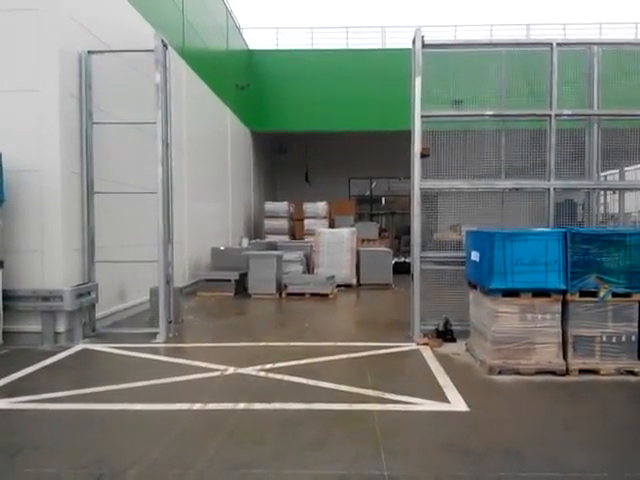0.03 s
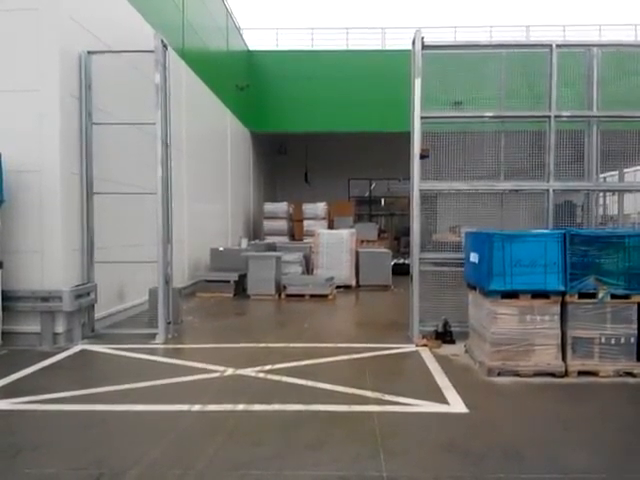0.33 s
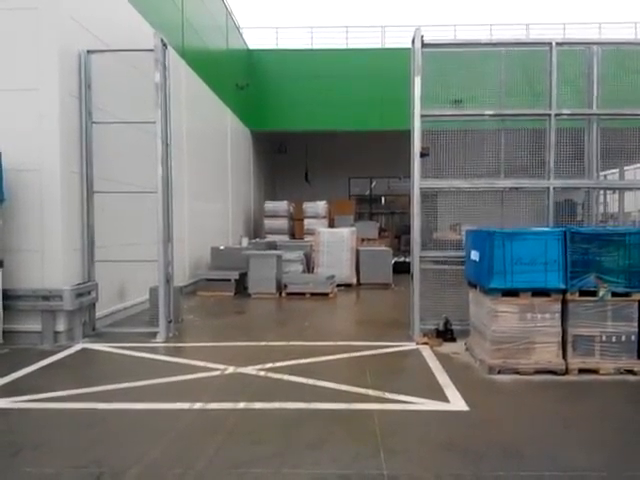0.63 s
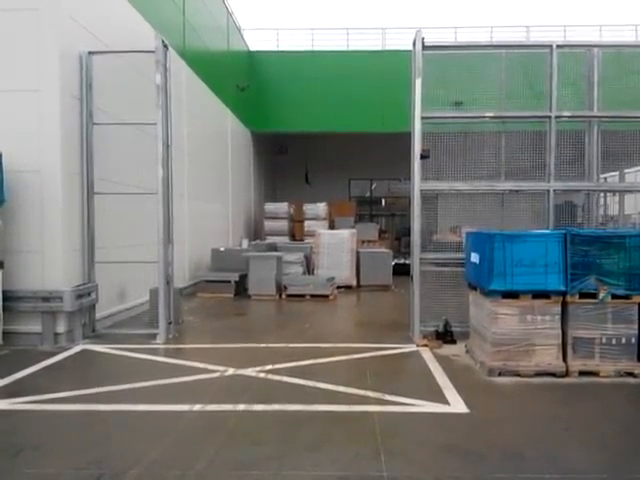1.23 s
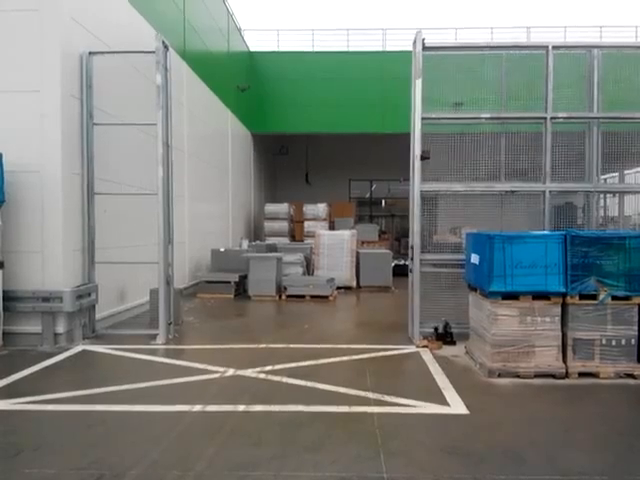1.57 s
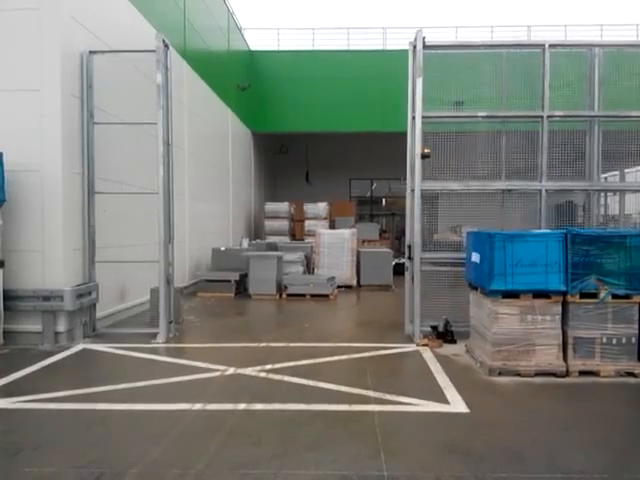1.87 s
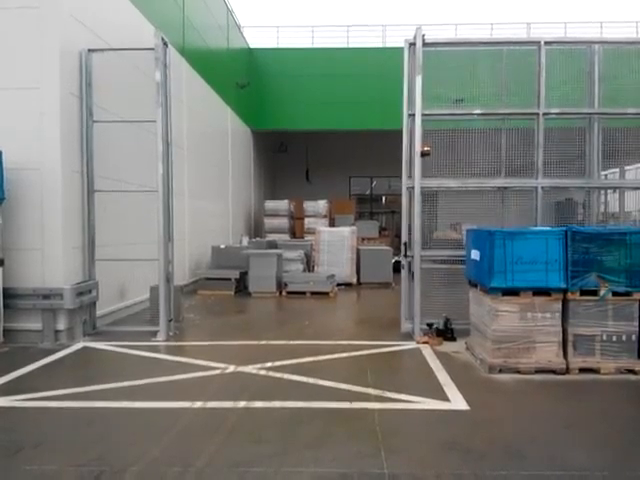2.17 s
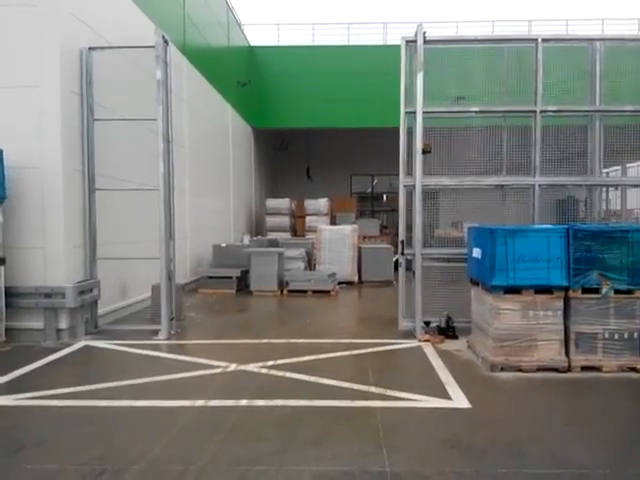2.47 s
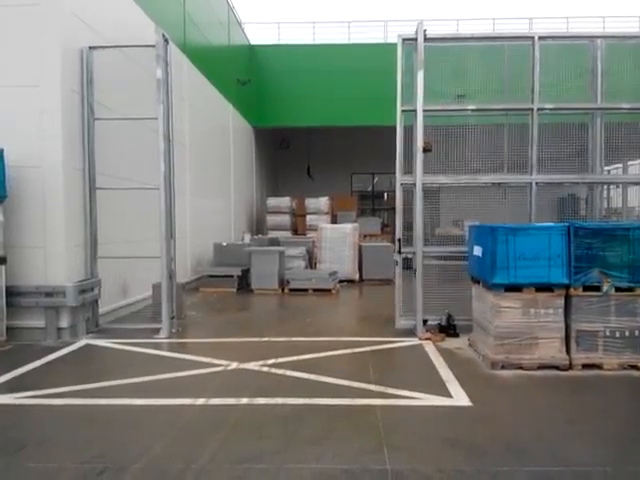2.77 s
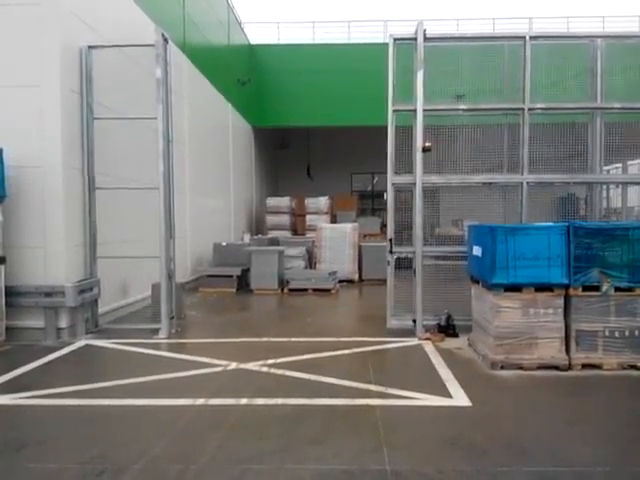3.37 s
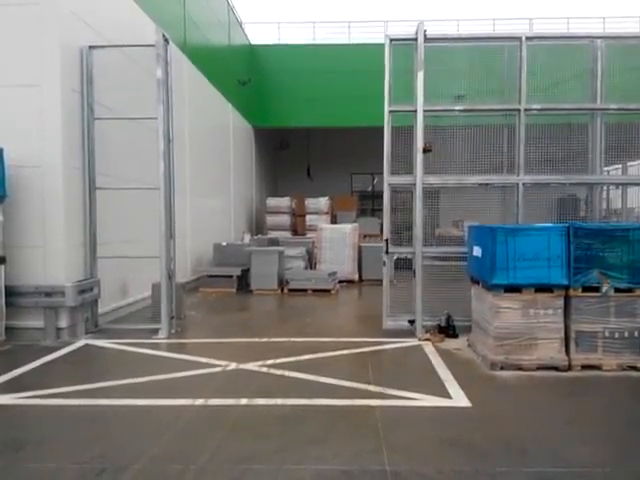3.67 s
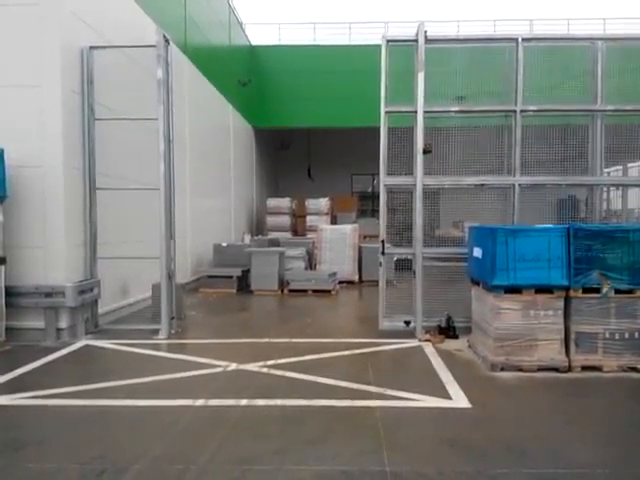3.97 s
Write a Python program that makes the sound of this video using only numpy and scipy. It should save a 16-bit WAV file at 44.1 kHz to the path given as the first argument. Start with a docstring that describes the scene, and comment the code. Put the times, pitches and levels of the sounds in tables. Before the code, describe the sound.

A heavy steel sliding gate knocks twice, gives one bright, booming clank, then rolls with growling wheels and rattling bars. It is heard from some metres away in an echoing walled yard, over low machinery rumble and hum.

```python
"""A heavy steel sliding gate, some metres away in a walled industrial yard.
It knocks twice, its drive takes up the slack with one bright clank that sets the frame booming,
and it rolls off, wheels growling and loose bars rattling. Each blow is a noise burst plus ringing
steel modes, and the walls answer with a diffuse tail. Underneath sit a low, wavering drone
and a bed of machinery rumble, hum and yard air."""
import sys
import numpy as np
from scipy import signal
from scipy.fft import rfft, irfft, next_fast_len
from scipy.io import wavfile
from scipy.ndimage import map_coordinates

SR = 44100
rng = np.random.default_rng(int(sys.argv[2]) if len(sys.argv) > 2 else 0)


def bounce(signal):
    """Save signal as a 16-bit WAV file at the path given by the first command-line argument."""
    frames = np.transpose(np.atleast_2d(signal))
    limited = np.clip(frames, -1, 1)
    pcm = np.round(limited * 32767).astype(np.int16)
    wavfile.write(sys.argv[1], SR, pcm)


N = 176400


def amp(db):
    """Decibels to gain."""
    return 10 ** (np.asarray(db) / 20)


def unit(x):
    """Scale to rms 1."""
    return x / np.sqrt(np.mean(x ** 2) + 1e-20)


def along(points, hz):
    """Read a (frequency, value) curve on a log frequency axis."""
    freqs, values = np.transpose(points)
    return np.interp(np.log(hz + 1), np.log(freqs + 1), values)


def wobble(rate):
    """Smooth random modulation, rate knots a second."""
    return map_coordinates(rng.standard_normal(1024), [np.arange(N) * rate / SR + 2], mode="mirror")


def attack(t, rise_s):
    """Onset envelope with time constant rise_s."""
    return 1 - np.exp(-t / rise_s)


def fade(t, t60):
    """Exponential decay, 60 dB down after t60 seconds."""
    return np.exp(-np.log(1000) * t / t60)


def add(out, s, sound):
    """Mix a sound in at time s."""
    part = out[:, max(round(s * SR), 0):]
    part[:, :sound.shape[1]] += sound[:, :part.shape[1]]


def filtered(x, response):
    """EQ x with a gain that is a function of frequency."""
    n = x.shape[-1]
    padded = next_fast_len(n + 8192)
    return irfft(rfft(x, padded) * response(np.fft.rfftfreq(padded, 1 / SR)), padded)[..., :n]


def panned(x, pan):
    """Lean a sound to the left, by a different amount at each frequency."""
    return filtered(x, lambda hz: amp(along(pan, hz) * np.array([[.5], [-.5]])))


# Stereo image of the noise (frequency [Hz], left-right correlation [-1..1])
CORRELATION = [(130, 0.99), (350, 0.96), (700, 0.88), (1400, 0.74), (2800, 0.67), (3800, 0.3),
               (4800, 0.049), (6000, -0.34), (7500, -0.46)]
def noise(colour_db, size):
    """Stereo noise of rms 1, centred in the bass and wide in the treble."""
    def mid_side_gains(hz):
        angle = np.arccos(np.clip(along(CORRELATION, hz), -1, 1)) / 2
        return amp(colour_db(hz)) * [np.cos(angle), np.sin(angle)]
    mid, side = filtered(rng.standard_normal((2, size)), mid_side_gains)
    return unit(np.array([mid + side, mid - side]))


def rush(colour, size):
    """Noise shaped by an EQ curve."""
    return noise(lambda hz: along(colour, hz), size)


def band(centre_hz, octaves, size):
    """Noise in one resonance."""
    return noise(lambda hz: -20 * np.log10(1 + (np.log2((hz + 1) / centre_hz) / octaves) ** 2 / 2), size)


# Machinery hum lines (frequency [Hz], level [dB], phase wander [rad])
HUM_LINES = [(50.3, -45, 0.15), (100.37, -45, 0.071), (149.4, -52.5, 0.05), (207, -52.5, 2.7),
             (255, -58.5, 0.58), (300.1, -58.5, 0.1)]
# EQ of the machinery rumble and of the yard air (frequency [Hz], gain [dB])
RUMBLE_EQ = [(20, -31.5), (31, -13.5), (43, -15.5), (49, -0.5), (60, 4.5), (88, 0.5), (112, -2.5), (140, 0),
             (175, -4.5), (215, 1.5), (255, -6.5), (265, -16), (295, -15.5), (320, -24), (400, -42),
             (600, -68.5)]
AIR_EQ = [(190, -42), (330, -4.5), (400, -4.5), (460, -2.5), (580, -4.5), (640, -6.5), (800, -13.5),
          (1150, -16), (1700, -18.5), (3600, -17), (5300, -17.5), (5900, -20.5), (7400, -24), (8200, -41),
          (10000, -80.5)]
def machinery(rumble_db=-41.5, air_db=-57, waver_db=0.5):
    """The bed: steady rumble, wavering hum lines and the air of the yard."""
    t = np.arange(N) / SR
    hum = np.zeros(N)
    for hz, db, wander in HUM_LINES:
        peak = np.sqrt(2) * amp(db + waver_db * wobble(7.2))
        hum += peak * np.sin(2 * np.pi * hz * t + wander * wobble(6))
    air = amp(air_db + 0.83 * wobble(8)) * rush(AIR_EQ, N)
    return hum + amp(rumble_db) * rush(RUMBLE_EQ, N) + air


# Pitch and level automation of the drone (time [s], pitch [Hz], level [dB])
DRONE_PATH = [(0, 208.8, -53), (.2, 204, -43), (0.701, 207, -43), (1.053, 215.4, -46), (1.5, 214.4, -47.5),
              (1.852, 223.1, -45.5), (2.397, 221.9, -56.5), (2.717, 238, -43), (3.051, 238.2, -47.5),
              (3.298, 211.6, -46.5), (4, 215.5, -46.5)]
def drone(wander_rad=0.85, waver_db=2.0):
    """A low, wavering tone that rises a little while the gate travels, then sinks back."""
    t = np.arange(N) / SR
    s, hz, db = np.transpose(DRONE_PATH)
    phase = 2 * np.pi * np.cumsum(np.interp(t, s, hz)) / SR + wander_rad * wobble(12)
    return np.sqrt(2) * amp(np.interp(t, s, db) - waver_db * wobble(5.4)) * np.sin(phase)


# Fader ride of the wheel growl (time [s], level [dB])
GROWL_RIDE = [(0, -69), (.8, -48), (1.5, -43.5), (2.2, -43.5), (2.8, -47.5), (3.3, -45), (4, -55.5)]
# EQ of the growl (frequency [Hz], gain [dB])
GROWL_EQ = [(60, -32.5), (130, -2), (200, -2), (245, 0.5), (275, -7), (330, -17.5), (420, -34),
            (600, -25.5), (900, -61.5)]
def wheel_growl():
    """The low growl of the wheels swells and eases off."""
    t = np.arange(N) / SR
    return amp(np.interp(t, *np.transpose(GROWL_RIDE))) * rush(GROWL_EQ, N)


# Fader ride of the rolling on the track (time [s], level [dB])
ROLL_RIDE = [(0, -62.5), (1.5, -68), (1.9, -62.5), (2.4, -62.5), (3.0, -60), (3.4, -62.5), (4, -63.5)]
# EQ of steel contact noise, for rolling and knocks (frequency [Hz], gain [dB])
CONTACT_EQ = [(400, -14.5), (850, -13), (1200, -0.5), (1450, -4.5), (1750, -1.5), (2050, -2.5), (2350, -3),
              (2750, -3.5), (3550, -8), (3850, -11), (5300, -15.5), (5900, -33), (7800, -45),
              (10000, -71.5)]
def rolling(jitter_db=2, hiss_db=-68.5, hiss_start_s=3.308, hiss_rise_s=0.25):
    """The wheels keep the steel trembling; a thin hiss joins late."""
    t = np.arange(N) / SR
    level_db = np.interp(t, *np.transpose(ROLL_RIDE)) + jitter_db * wobble(40)
    tremble = amp(level_db) * rush(CONTACT_EQ, N)
    hiss = amp(hiss_db) * band(centre_hz=5170, octaves=0.099, size=N)
    return tremble + hiss * np.clip((t - hiss_start_s) / hiss_rise_s, 0, 1)


# Ticks and scuffs (time [s], level [dB], centre [Hz], width [octaves], t60 [s])
TICK_CUES = [(.012, -53.5, 4400, 0.075, 0.059), (0.055, -49.5, 4700, 0.096, 0.055),
             (.056, -56, 2070, 0.13, 0.071), (.076, -51, 3010, 0.012, 0.18),
             (0.118, -48, 1800, 0.23, 0.037), (.491, -51.5, 4830, 0.17, 0.041),
             (0.518, -64, 4900, 0.29, 0.57), (0.594, -59.5, 4400, 0.12, 0.22),
             (0.988, -50.5, 1920, 0.32, 0.033), (1.035, -54.5, 5070, 0.26, 0.036),
             (1.25, -46.5, 2300, 0.45, 0.015), (1.291, -51, 3400, 0.16, 0.05),
             (1.299, -48.5, 3140, 0.38, 0.03), (1.4433, -41.5, 4750, 0.092, 0.063),
             (1.443, -47, 2130, 0.38, 0.099), (2.23, -56.5, 4640, 0.29, 0.41),
             (2.265, -57, 4000, 0.13, 0.33), (2.293, -49, 3220, 0.16, 0.061),
             (2.581, -57.5, 4250, 0.2, .15)]
def ticks(attack_s=0.0013):
    """Light contacts, each in one short resonance, the loudest just before the clank."""
    out, t = np.zeros((2, N)), np.arange(SR // 2) / SR
    for s, db, hz, octaves, t60 in TICK_CUES:
        add(out, s, amp(db) * band(hz, octaves, len(t)) * fade(t, t60) * attack(t, attack_s))
    return out


# Reverb time of the walled yard (frequency [Hz], t60 [s])
YARD_DECAY = [(300, 1.5), (1200, 2.9), (2500, 2.7), (4000, 1.7), (7000, .65)]
def yard_tail(colour, size):
    """The walls answer with a diffuse tail whose treble dies first."""
    hz, t, spectrum = signal.stft(rush(colour, size), SR, nperseg=256)
    decay = fade(t, along(YARD_DECAY, hz)[:, None])
    return signal.istft(spectrum * decay, SR, nperseg=256)[1][:, :size]


def steel(modes, t, detune_hz, neighbour_db, wide_hz=4760):
    """Ringing steel: each mode beats against two weaker neighbours, differently on every strike."""
    ring = np.zeros((2, len(t)))
    for hz, db, t60 in modes:
        envelope = amp(db) * fade(t, t60)
        for k, (start, detune, spread) in enumerate(rng.standard_normal((3, 3))):
            gain, pitch = (amp(neighbour_db), hz + detune_hz * detune) if k else (1, hz)
            # Modes near wide_hz reach the two ears about a radian apart.
            phase = np.pi * start + np.array([[spread], [-spread]]) * (hz / wide_hz) ** 2 / 2
            ring += gain * envelope * np.sin((2 * np.pi * pitch * t + phase).astype(np.float32))
    return ring


# Lurches of the gate (time [s], level [dB])
THUD_CUES = [(0.1712, -37.5), (0.288, -45), (1.727, -36.5)]
# EQ of a thud (frequency [Hz], gain [dB])
THUD_EQ = [(60, -29.5), (85, -10), (102, 7.5), (125, -3.5), (150, -5.5), (200, -10), (280, -55)]
def thuds(attack_s=0.0018, t60=1):
    """The whole gate lurches under its first three knocks, adding dull low-end weight."""
    out, t = np.zeros((2, N)), np.arange(SR) / SR
    for s, db in THUD_CUES:
        add(out, s, amp(db) * rush(THUD_EQ, len(t)) * fade(t, t60) * attack(t, attack_s))
    return out


# Loose knocks (time [s], level [dB], tail send [dB], tilt [dB/octave], ring focus [Hz])
KNOCK_CUES = [(0.1718, -46, -7, 3.5, 2950), (.287, -47.5, -3.5, 6, 3600), (1.727, -45, -7.5, 5.5, 3030),
              (1.892, -48.5, -18.5, 4.5, 2700), (1.986, -49.5, -9, 2, 2700), (2.099, -52, -21, 1, 2700),
              (2.381, -52.5, -4.5, -9, 1200), (2.501, -50, -20, 2.5, 1700), (2.52, -51, -16, 7, 3300),
              (2.678, -46.5, -11.5, 1, 2500), (2.684, -49.5, -8, -3.5, 1200), (2.759, -48, -13, -3.5, 1600),
              (2.811, -48.5, -16, -3, 2350), (2.939, -49, -6.5, 0, 1850), (3.019, -48, -3.5, 2.5, 3200),
              (3.06, -49.5, -5.5, -0.5, 1780), (3.149, -52, -12, -1, 2000), (3.191, -52.5, -14, -3, 2000),
              (3.54, -56, -6.5, -2.5, 2450), (3.686, -53.5, -16, -6, 1200), (3.796, -52.5, -8, -8.5, 1200),
              (3.955, -53, -8, -2, 1700)]
# Modes of the loose bars (frequency [Hz], level [dB], t60 [s])
BAR_MODES = [(1160, -6, 0.38), (1340, -8, 0.25), (1695, -1.5, 0.51), (1975, -1, 0.47), (2078, -4, 0.68),
             (2300, -12, 0.4), (2640, -5, 0.3), (2680, -2.5, 0.34), (3190, -4.5, 0.27), (3400, -7, 0.41),
             (3510, -6.5, 0.42)]
def knocks(contact_t60=0.075, attack_s=0.00033, ring_db=-6.5, yard_db=-7, focus_db=4.5, focus_oct=0.39):
    """The gate rattles; where each knock lands decides which of the loose bars ring most."""
    out, t = np.zeros((2, N)), np.arange(3 * SR // 4) / SR
    for s, db, tail_db, tilt_db, focus_hz in KNOCK_CUES:
        colour = [(hz, level + tilt_db * np.log2(min(hz, 3500) / 2000)) for hz, level in CONTACT_EQ]
        bars = [(hz, level + focus_db * np.exp(-(np.log2(hz / focus_hz) / focus_oct) ** 2), t60)
                for hz, level, t60 in BAR_MODES]
        ring = amp(ring_db) * steel(bars, t, detune_hz=27.3, neighbour_db=-5)
        reverb = amp(yard_db) * yard_tail(colour, len(t)) * fade(t, t60=1.6)
        contact = rush(colour, len(t)) * fade(t, contact_t60)
        add(out, s, amp(db) * (contact + amp(tail_db) * (ring + reverb)) * attack(t, attack_s))
    return out


# Jolts of the frame: the clank and its rebound (time [s], level [dB])
JOLT_CUES = [(1.4582, -59), (1.509, -50.5)]
# EQ of the frame's boom (frequency [Hz], gain [dB])
FRAME_EQ = [(250, -21), (370, -11), (450, 6.5), (560, -0.5), (680, -15), (900, -6.5), (1500, -54.5)]
def frame_boom(attack_s=0.0018, thump_db=9.5, thump_t60=0.036, boom_t60=3.3):
    """The heavy frame is jolted by the clank and rebounds harder: a short thump, then a long boom."""
    out, t = np.zeros((2, N)), np.arange(2 * SR) / SR
    envelope = (fade(t, boom_t60) + amp(thump_db) * fade(t, thump_t60)) * attack(t, attack_s)
    for s, db in JOLT_CUES:
        add(out, s, amp(db) * rush(FRAME_EQ, len(t)) * envelope)
    return out


# Blows within the clank (time [s], level [dB], ring send [dB])
CLANK_CUES = [(1.4583, -28.5, -12), (1.4645, -39.5, -15.5), (1.503, -42.5, -10), (1.514, -40, -14)]
# EQ of the crash (frequency [Hz], gain [dB])
CLANK_EQ = [(400, -37), (700, -21), (850, -9), (1020, -19), (1250, -10.5), (1520, -10), (2000, -6.5),
            (2660, -4.5), (2860, -6.5), (3300, -5.5), (4000, -5.5), (4900, -7), (5400, -12), (5800, -20.5),
            (8000, -38)]
# Modes of the drive and frame (frequency [Hz], level [dB], t60 [s])
DRIVE_MODES = [(840, -16, 0.14), (1188, -16.5, 0.62), (1412, -24, 0.47), (1780, -13, .45), (1948, -6, 0.59),
               (2400, -11.5, 1.2), (2404, -5, 0.35), (2630, -4.5, 0.76), (2706, 5, 0.22), (3260, 3, 0.15),
               (3590, -14, 0.8), (3740, 3, 0.12), (3920, -2, 0.096), (4300, -6, 0.18), (4870, -5, 0.33)]
def clank(attack_s=0.00088, crash_t60=0.049, mesh_db=-11, mesh_t60=0.59, yard_db=-18):
    """The main hit: the drive takes up its slack; quick blows crash, shake the mesh and ring the steel."""
    out, t = np.zeros((2, N)), np.arange(2 * SR) / SR
    envelope = fade(t, crash_t60) + amp(mesh_db) * fade(t, mesh_t60)
    for s, db, ring_db in CLANK_CUES:
        crash = envelope * rush(CLANK_EQ, len(t))
        ring = amp(ring_db) * steel(DRIVE_MODES, t, detune_hz=26.4, neighbour_db=-9)
        reverb = amp(yard_db) * yard_tail(CLANK_EQ, len(t)) * attack(t, rise_s=0.014)
        add(out, s, amp(db) * (crash + ring + reverb) * attack(t, attack_s))
    return out


# Pan of the gate and bed buses (frequency [Hz], left over right [dB])
GATE_BUS_PAN = [(400, 1), (1400, 1.5), (2800, 2), (5000, 5.5)]
BED_BUS_PAN = [(30, 1.3), (75, 0.5), (130, 0.5), (175, 2.5), (250, 0), (500, .5), (1500, 3), (4000, 1.5),
               (7000, 1.5)]
def scene():
    """The gate over its low bed, both leaning a little to the left."""
    gate = clank() + frame_boom() + thuds() + knocks() + ticks() + rolling()
    bed = machinery() + drone() + wheel_growl()
    return panned(gate, GATE_BUS_PAN) + panned(bed, BED_BUS_PAN)


def record(dry):
    """A brick-wall low-pass on the master."""
    cutoff_hz = 8200
    return filtered(dry, lambda hz: 1 / np.sqrt(1 + (hz / cutoff_hz) ** 120))


dry = scene()
out = record(dry)
bounce(out)
```